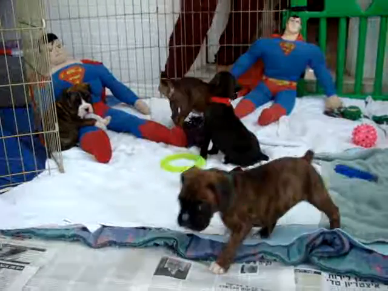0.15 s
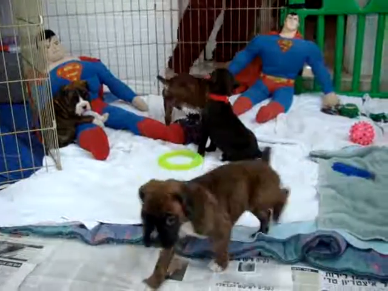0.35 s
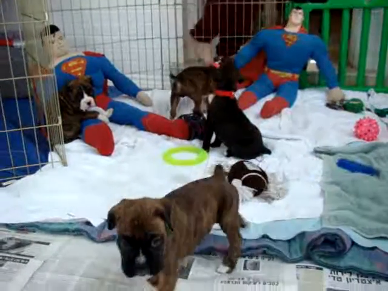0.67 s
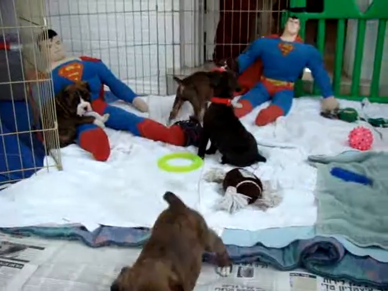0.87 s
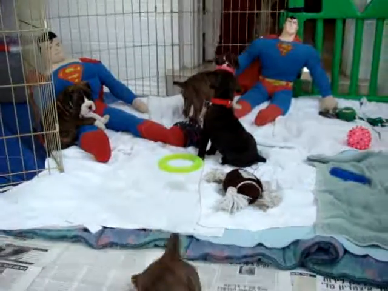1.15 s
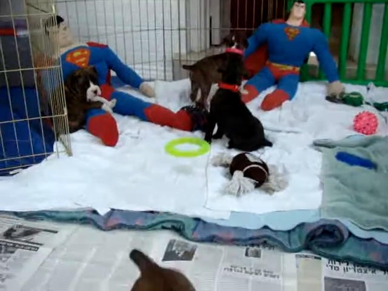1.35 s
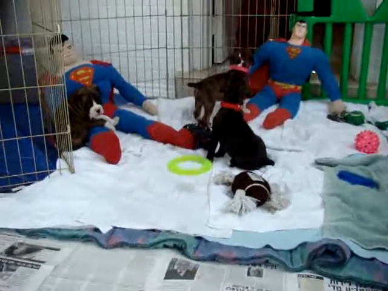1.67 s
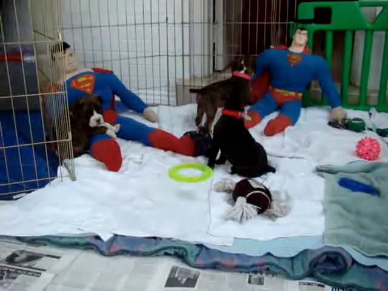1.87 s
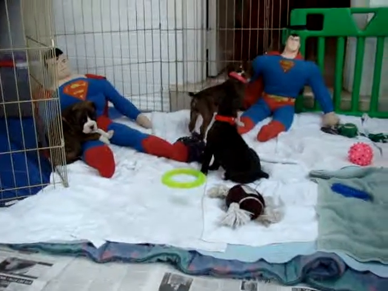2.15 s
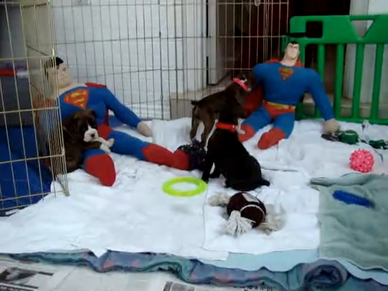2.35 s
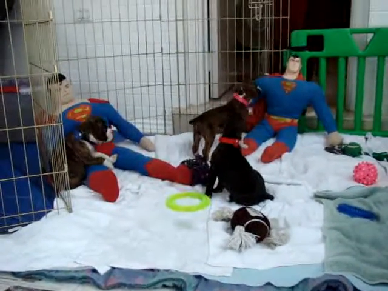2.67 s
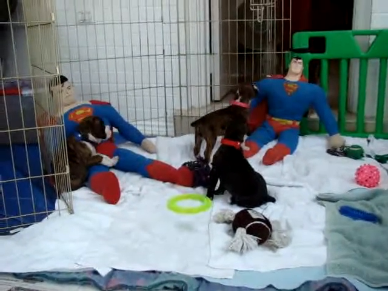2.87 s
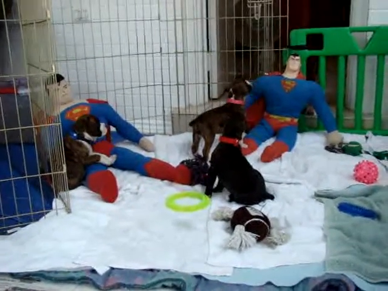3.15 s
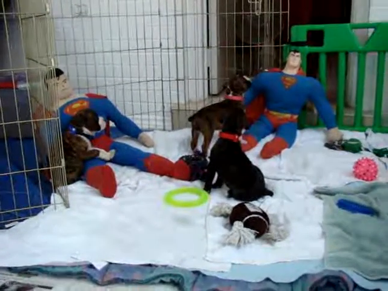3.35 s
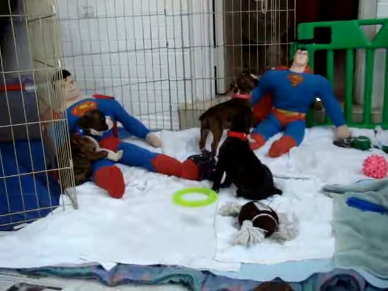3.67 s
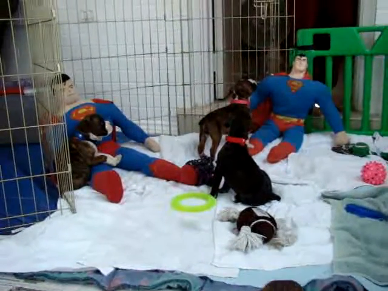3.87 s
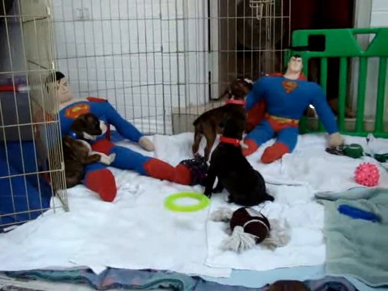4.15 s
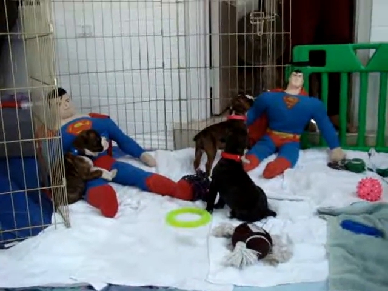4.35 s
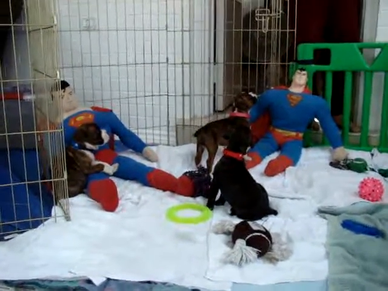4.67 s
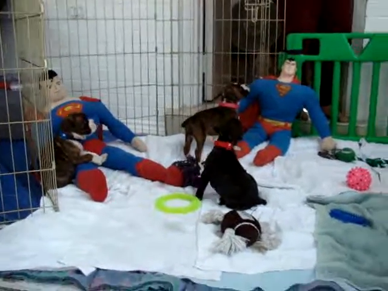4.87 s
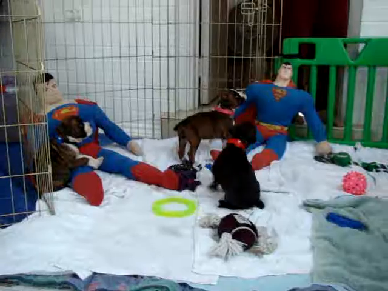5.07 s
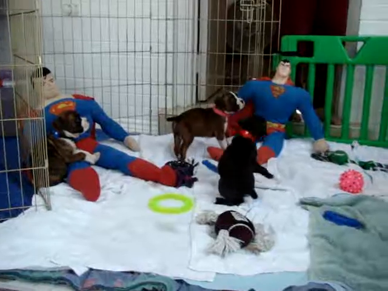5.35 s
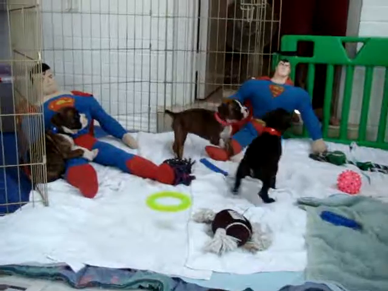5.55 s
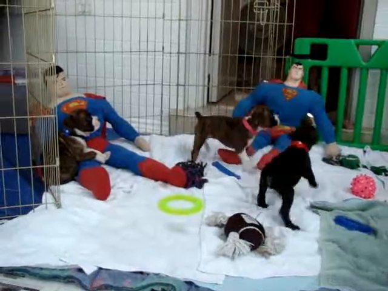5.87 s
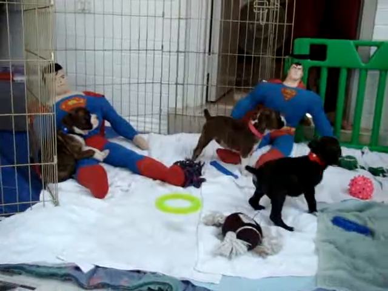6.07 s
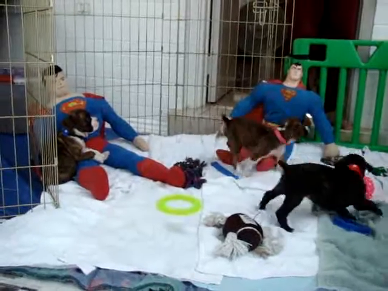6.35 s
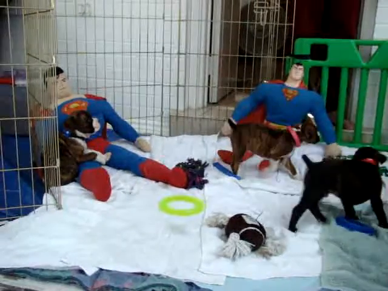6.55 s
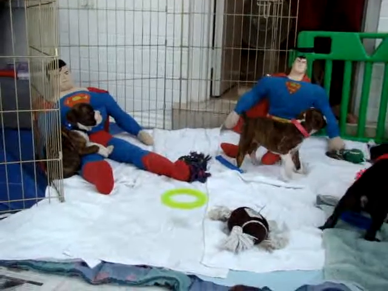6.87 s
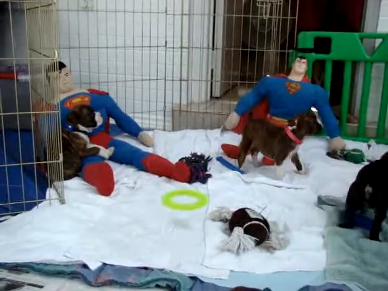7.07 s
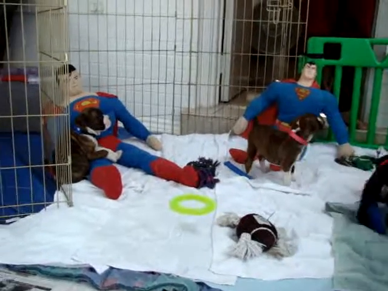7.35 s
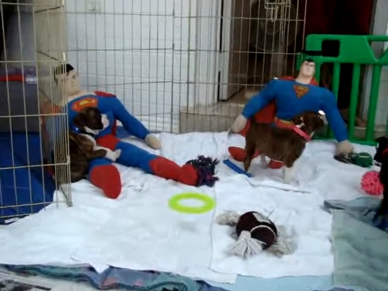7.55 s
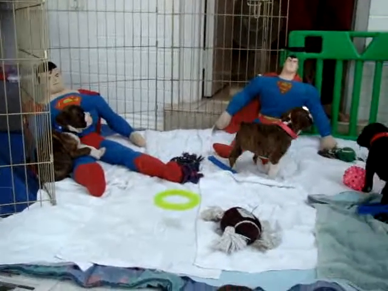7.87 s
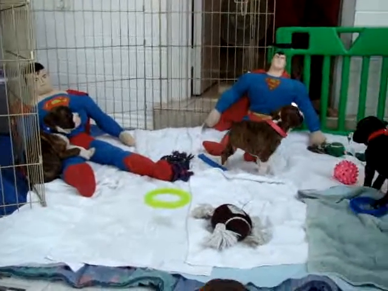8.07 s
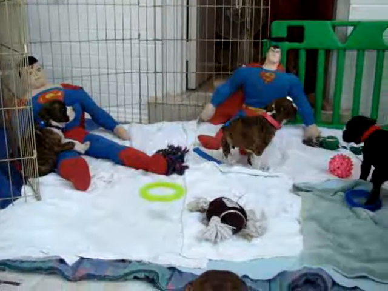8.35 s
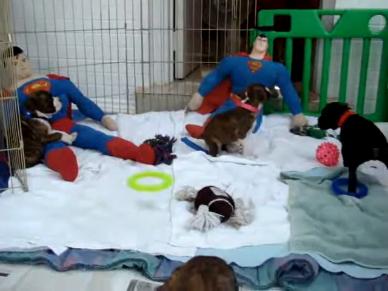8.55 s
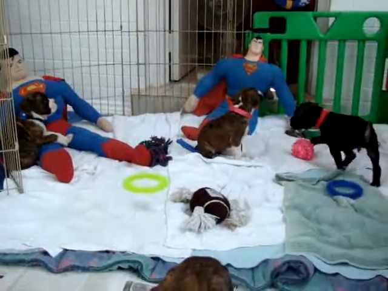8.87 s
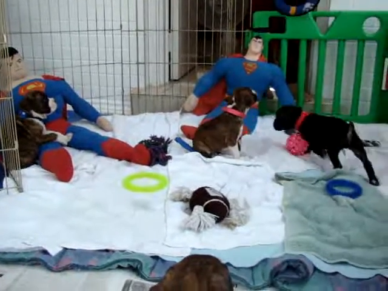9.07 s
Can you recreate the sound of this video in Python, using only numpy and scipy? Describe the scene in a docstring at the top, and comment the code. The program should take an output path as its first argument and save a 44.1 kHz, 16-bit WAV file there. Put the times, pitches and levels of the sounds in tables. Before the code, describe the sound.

Short reedy squeaks alternate with weaker falling ones as puppies shuffle on paper and bedding, with hard plastic taps close to the microphone late on.

```python
"""Puppies and a squeaky toy

Indoors in a pen, at one mono microphone: a puppy chews a squeaky toy about three times a second.
Each bite drives air out through the reed; the toy answers with a weaker, falling squeak as it refills.
Paws thump (ringing floor modes) and scuff (shaped noise) over newspaper and blankets.
Close by, something taps the camera's case, faintly early on and hard late on."""
import sys
import numpy as np
from scipy import signal
from scipy.fft import rfft, irfft, next_fast_len
from scipy.io import wavfile

SR = 44100
rng = np.random.default_rng(int(sys.argv[2]) if len(sys.argv) > 2 else 0)


def materialize(psi):
    """Save the field psi as 16-bit PCM at rate SR to the path in sys.argv[1].

    A 1-D psi becomes a single channel; in a 2-D psi each row is a channel.
    """
    bounded = np.clip(np.atleast_2d(psi).T, -1, 1)
    quanta = np.round(bounded * 32767).astype(np.int16)
    wavfile.write(sys.argv[1], SR, quanta)


N = 406161


def gain_of(db):
    """Decibels to amplitude."""
    return 10 ** (np.asarray(db) / 20)


def evened(x):
    """Scales to an rms of 1."""
    return x / np.sqrt(np.mean(x ** 2) + 1e-20)


def read_table(points, hz):
    """Reads a table along a logarithmic frequency axis."""
    f, value = np.transpose(points)
    return np.interp(np.log(hz + 1), np.log(f + 1), value)


def add(mix, s, sound):
    """Mixes a sound in at time s."""
    part = mix[max(round(s * SR), 0):][:len(sound)]
    part += sound[:len(part)]


def noise(size):
    """White noise."""
    return rng.standard_normal(size)


def coloured(x, spectrum):
    """Gives x a spectrum, at an rms of 1."""
    size = next_fast_len(len(x), True)
    gain = gain_of(read_table(spectrum, np.fft.rfftfreq(size, 1 / SR)))
    return evened(irfft(rfft(x, size) * gain, size)[:len(x)])


def wander(size, hz):
    """Chance of unit spread that changes up to hz times a second."""
    place = np.arange(size) * 2 * hz / SR
    knots = noise(int(place[-1]) + 2)
    # straight lines between knots lose spread; the last factor restores it
    return np.interp(place, np.arange(len(knots)), knots) * np.sqrt(3 / 2)


# The pen when nothing moves. Each row: frequency in Hz, relative level in dB per Hz.
ROOM_TONE = [(30, -15.5), (90, -13.5), (170, -5), (400, -3), (750, -11.5), (1200, 1.5), (2000, -14.5),
             (5000, -26.5), (10000, -30)]


def room_tone():
    """The still room is steady noise with the room's own spectrum, at an rms of -54 dB."""
    return gain_of(-54) * coloured(noise(N), ROOM_TONE)


# Paws on blankets. Each row: frequency in Hz, relative level in dB per Hz.
SCUFF = [(30, -37), (90, -30), (160, -10.5), (280, -6.5), (430, 5), (700, -0.5), (1100, -7), (2000, -19),
         (10000, -40.5)]
# Newspaper underfoot. Each row: frequency in Hz, relative level in dB per Hz.
RUSTLE = [(200, -18), (700, -3.5), (1400, 2), (2000, 4), (3500, 1.5), (6000, 0), (10000, -6.5)]
# A paw slides and drags the bedding. Each row: start in seconds, length in seconds,
# newspaper rustle in dB before the paper gain, blanket scuff in dB.
SLIDES = [(0.441, 0.22, -41, -47.5), (0.96, 0.25, -56, -66), (1.23, 0.16, -45.5, -46.5),
          (1.417, 0.1, -48, -49), (1.597, 0.099, -48, -52), (2.415, 0.2, -46.5, -54.5),
          (3.33, 0.38, -51.5, -47), (4.729, 0.13, -36.5, -44), (4.946, 0.16, -45, -46),
          (5.56, 0.13, -48, -45.5), (6.383, 0.15, -49.5, -46), (6.797, 0.13, -48, -50),
          (6.89, 0.13, -47, -45), (7.365, 0.31, -54, -54.5), (8.492, 0.23, -46, -44.5),
          (9.113, 0.14, -49, -49)]
# The litter's constant shuffling. Each row: time in seconds, level in dB before the paper's offset and gain.
SHUFFLE = [(0.0, -49), (0.62, -52.5), (0.74, -52), (1.08, -50), (2.25, -58), (2.77, -51.5), (3.67, -48.5),
           (4.08, -52.5), (4.67, -52.5), (4.9, -42), (5.26, -54), (6.75, -47.5), (7.85, -54.5), (9.21, -45)]
# A slide swells and dies in one arch: share of its length at the peak, exponent (lower is fuller)
SLIDE_PEAK_AT, SLIDE_SHAPE = 0.38, 0.54
SHUFFLE_CLOTH_DB, SHUFFLE_PAPER_DB, PAPER_GAIN_DB = 0, -5, 7.5


def movement():
    """Friction is uneven noise on cloth and lumpy noise on newspaper, always faint, swelling with each slide."""
    shuffle_db = np.interp(np.arange(N) / SR, *np.transpose(SHUFFLE))
    on_cloth, on_paper = np.zeros((2, N))
    for s, length, paper_db, cloth_db in SLIDES:
        share = np.arange(0, length, 1 / SR) / length
        progress = np.interp(share, [0, SLIDE_PEAK_AT, 1], [0, .5, 1])
        speed = abs(np.sin(np.pi * progress)) ** SLIDE_SHAPE
        add(on_cloth, s, gain_of(cloth_db) * speed)
        add(on_paper, s, gain_of(paper_db) * speed)
    lumps, crumples, grain = wander(N, 25), wander(N, 35), wander(N, 400)
    scuff = coloured(noise(N) * gain_of(3.14 * lumps), SCUFF)
    paper = coloured(noise(N) * gain_of(2.3 * crumples + 2.7 * grain), RUSTLE)
    # slides and shuffling add as powers
    scuff *= np.hypot(on_cloth, gain_of(shuffle_db + SHUFFLE_CLOTH_DB))
    paper *= np.hypot(on_paper, gain_of(shuffle_db + SHUFFLE_PAPER_DB))
    return scuff + gain_of(PAPER_GAIN_DB) * paper


def pressure(t, length, rise, fall):
    """Air pressure in the toy: a quick rise, a hold, and a fall once the stroke ends (times in seconds)."""
    build_up = 1 - np.exp(-t / rise)
    return build_up / (1 + np.exp(np.minimum((t - length) / fall, 50)))


# Air rushing past the reed. Each row: frequency in Hz, relative level in dB per Hz.
AIR = [(500, -26.5), (1300, -23), (3000, -14), (5500, 2.5), (7500, -6.5), (9600, -17), (11000, -3)]


def reed(hz, rough, partials, flutter, fray, rasp, air_db):
    """A buzzing reed; overblown, its partials flicker and split, and more air hisses by."""
    size = len(hz)
    turns = np.cumsum(hz * (1 + flutter * rough * wander(size, 200))) / SR
    # the reed also twists, far more slowly, which puts side lines beside each partial
    twist = np.sin(2 * np.pi * rng.uniform(.2, .36) * turns) * rough ** 2
    tone = np.zeros(size)
    for k in range(1, 10):
        phase = k * turns + rng.random() + .035 * k * twist
        flicker, slip, uneven = wander(size, 150), wander(size, 150), wander(size, 150)
        unrest = fray * rough * (k / 4) ** .25
        line = (1 + unrest * flicker) * np.cos(2 * np.pi * phase + unrest * slip)
        # strong and weak beats alternate: a line halfway to the next partial
        half_line = rasp * rough * uneven * np.cos(2 * np.pi * (phase + turns / 2))
        partial_db = read_table(partials, k * hz) + 2.53 * rng.standard_normal()
        tone += gain_of(partial_db) * (line + half_line)
    air = gain_of(air_db) * rough * coloured(noise(size), AIR)
    return evened((evened(tone) + air) / np.sqrt(1 + rough ** 2))


# The reed blown inwards. Each row: frequency in Hz, strength of a partial there in dB before its random offset.
REED_IN = [(1200, 1.5), (2400, 2), (3600, -3), (4800, -4.5), (6000, -9), (7200, -10.5), (8400, -11.5),
           (9600, 5.5), (10500, -1.5)]
# The toy draws air back in. Each row: start in seconds, length in seconds,
# level in dB before the mix gain and fade, settled pitch in Hz.
REFILLS = [(0.115, 0.025, -38, 1176), (0.486, 0.035, -36.5, 1215), (0.859, 0.046, -40, 1189),
           (1.24, 0.056, -39, 1193), (1.586, 0.043, -40, 1205), (1.985, 0.047, -42.5, 1182),
           (2.36, 0.065, -42.5, 1177), (3.122, 0.05, -41, 1190), (3.517, 0.051, -40, 1222),
           (3.955, 0.033, -38, 1192), (4.325, 0.062, -39, 1190), (4.681, 0.049, -37.5, 1224),
           (5.06, 0.05, -39.5, 1189), (5.423, 0.072, -43, 1165), (5.771, 0.049, -40, 1186),
           (6.099, 0.046, -43, 1173), (6.427, 0.044, -40, 1170), (6.713, 0.038, -39, 1182),
           (7.024, 0.051, -42.5, 1183), (7.302, 0.056, -40, 1177), (7.538, 0.056, -43, 1253),
           (7.726, 0.039, -40, 1232), (7.907, 0.04, -39.5, 1208), (9.034, 0.063, -35, 1275)]
# The squeak starts sharp by a share of the pitch, passes the settled pitch at a share of the stroke,
# goes on sinking to the end, and loses some dB per stroke length
REFILL_SHARP, REFILL_SETTLE_AT, REFILL_FADE_DB = 0.04, 0.699, 4.5


def refills():
    """The toy swells back, and its squeak sags as the suction fades."""
    out, t = np.zeros(N), np.arange(SR // 8) / SR
    for s, length, db, settled_hz in REFILLS:
        stroke = t / length
        hz = settled_hz * (1 + REFILL_SHARP * (1 - np.minimum(stroke, 1) / REFILL_SETTLE_AT))
        tone = reed(hz, 0.35, REED_IN, flutter=0.028, fray=1.0, rasp=0.055, air_db=-3.5)
        suction = pressure(t, length, rise=0.0014, fall=0.0032)
        add(out, s, gain_of(db - REFILL_FADE_DB * stroke) * suction * tone)
    return out


def ring(t, hz, peak_s):
    """A damped resonance whose envelope swells to 1 at peak_s and dies away."""
    return t / peak_s * np.exp(1 - t / peak_s) * np.sin(2 * np.pi * hz * t)


# Modes of the covered floor. Each row: frequency in Hz before random detuning, relative level in dB,
# t60 in seconds.
FLOOR_MODES = [(246.5, -13.5, 0.18), (308, 0, 0.053), (394, 0, 0.091), (456.6, 6, 0.036), (562, 2, 0.061),
               (740, 3.5, 0.039), (953, -5.5, 0.053)]
# Paws and toys landing on the floor. Each row: start in seconds, nominal peak in dB before the mix gain,
# main pitch in Hz, paper crackle in dB relative to the thump before its gain.
THUMPS = [(0.206, -30.5, 437, -10), (0.426, -32, 620, -12.5), (0.733, -25, 445, -16.5),
          (0.903, -15, 579, -26), (1.003, -25, 366, -16), (1.18, -29.5, 410, -8), (1.562, -26, 414, -17),
          (1.826, -24.5, 446, -12), (2.358, -40, 450, -6), (2.833, -29, 430, -18), (3.05, -32, 430, -17),
          (3.268, -29.5, 447, -17.5), (3.521, -23.5, 444, -18.5), (3.825, -31, 687, -15),
          (3.893, -36, 447, -20), (4.216, -31, 914, -17), (4.335, -35.5, 440, -22), (4.408, -36, 1094, -28),
          (4.552, -37, 1090, -7.5), (4.704, -23.5, 476, -18), (4.942, -12, 470, -20.5),
          (4.964, -18.5, 533, -24), (5.494, -36.5, 447, -13), (5.721, -22, 460, -22.5),
          (6.401, -32, 414, -9.5), (6.438, -31.5, 520, -16), (6.486, -28, 444, -13.5),
          (6.622, -34, 780, -25), (6.732, -36, 425, -8), (6.781, -23.5, 418, -17), (6.888, -20, 347, -12),
          (7.337, -28.5, 537, -22), (8.615, -26.5, 457, -13.5), (9.123, -24, 557, -22)]
CRACKLE_GAIN_DB = 10.5


def thumps():
    """A soft blow rings the floor and crushes the paper that lies on it."""
    out, t = np.zeros(N), np.arange(SR // 7) / SR
    for s, db, hz, crackle_db in THUMPS:
        floor = np.zeros(len(t))
        for mode_hz, level, t60 in FLOOR_MODES:
            swing = np.sin(2 * np.pi * (mode_hz * rng.uniform(0.882, 1.124) * t + rng.random()))
            floor += gain_of(level - 60 * t / t60) * swing
        body = 0.5 * floor * (1 - np.exp(-t / 0.00096)) + 0.68 * ring(t, hz, peak_s=0.0039)
        crush = np.exp(-t / 0.027) * (1 - np.exp(-t / 0.0012))
        paper = coloured(noise(len(t)), RUSTLE) * crush
        add(out, s, gain_of(db) * (body + gain_of(crackle_db + CRACKLE_GAIN_DB) * paper))
    return signal.sosfilt(signal.butter(1, 150, "high", fs=SR, output="sos"), out)


# The reed blown outwards. Each row: frequency in Hz, strength of a partial there in dB before its random offset.
REED_OUT = [(1200, -3.5), (2400, 0), (3600, -1.5), (4800, -0.5), (6000, 0.5), (7100, -2), (8400, 2),
            (9500, 8), (10500, -7.5)]
# One bite a row. Each row: start in seconds, length in seconds, level in dB before the mix gain and tremble,
# pitch at full pressure in Hz before flutter and catch, roughness from 0 to 1.
BITES = [(0.264, 0.05, -27, 1190, 0.45), (0.663, 0.046, -25, 1212, 0.44), (1.025, 0.059, -29, 1189, 0.4),
         (1.4, 0.047, -24.5, 1267, 0.24), (1.741, 0.06, -30, 1185, 0.19), (2.132, 0.053, -30.5, 1191, 0.17),
         (2.515, 0.05, -28.5, 1203, 0.21), (2.912, 0.061, -30, 1249, 0.24),
         (3.301, 0.041, -24.5, 1227, 0.33), (3.747, 0.028, -28.5, 1233, 0.46),
         (4.11, 0.045, -24, 1307, 0.84), (4.479, 0.039, -26.5, 1193, 0.54), (4.848, 0.047, -28, 1240, 0.44),
         (5.221, 0.045, -29, 1174, 0.28), (5.567, 0.044, -27, 1216, 0.48), (5.92, 0.044, -26, 1219, 0.32),
         (6.243, 0.0408, -24, 1277, 0.7), (6.557, 0.037, -23, 1254, 0.4), (6.844, 0.041, -25.5, 1248, 0.36),
         (7.158, 0.029, -26, 1222, 0.45), (7.414, 0.039, -23, 1380, 0.8), (7.611, 0.042, -24.5, 1447, 0.86),
         (7.792, 0.032, -25, 1220, 0.45), (8.9, 0.057, -27, 1239, 0.5), (9.116, 0.038, -25.5, 1287, 0.38)]
# A bite starts near the reed's own pitch, bends up to full pressure and sinks as the jaws stop:
# own pitch in Hz, share of the bend at the start, two shares of the stroke, final sag as a share of the pitch
REED_HZ, START_BEND, FULL_AT, EASE_AT, END_SAG = 1175.7, 0.25, 0.504, 0.84, 0.022
# Late in the stroke a rough reed catches: place and width as shares of the stroke,
# jump as a share of the pitch per unit of roughness
CATCH_AT, CATCH_WIDTH, CATCH_JUMP = 0.863, 0.2, 0.0903
# The jaws build up pressure, hold it unsteadily and let go
BITE_RISE_S, BITE_FALL_S, BITE_TREMBLE_DB = 0.0035, 0.0051, 0.5


def bites():
    """Closing jaws bend the pitch up; late in a rough stroke the reed catches, jumps in pitch and breaks up."""
    out, t = np.zeros(N), np.arange(SR // 8) / SR
    for s, length, db, full_hz, rough in BITES:
        stroke = t / length
        start_hz = REED_HZ + START_BEND * (full_hz - REED_HZ)
        bend_hz = [start_hz, full_hz, full_hz, start_hz * (1 - END_SAG)]
        hz = np.interp(stroke, [0, FULL_AT, EASE_AT, 1.3], bend_hz)
        catch_at = CATCH_AT + rng.uniform(-0.12, 0.097)
        catch = np.exp(-((stroke - catch_at) / CATCH_WIDTH) ** 4)
        hz = hz * (1 + rng.choice([-1, 1]) * CATCH_JUMP * min(rough, .5) * catch)
        growth = np.interp(stroke, [.35, .85], [.5, 1.05])
        breakup = np.minimum(rough * (growth + .8 * catch), 1)
        tone = reed(hz, breakup, REED_OUT, flutter=.022, fray=1.1, rasp=.38, air_db=-7)
        tremble_db = BITE_TREMBLE_DB * wander(len(t), 48.3)
        push = pressure(t, length, BITE_RISE_S, BITE_FALL_S)
        add(out, s, gain_of(db + tremble_db) * push * tone)
    return out


# Sharp snaps of claws and paper. Each row: start in seconds, nominal peak in dB before the mix gain.
SNAPS = [(1.004, -23.5), (1.0115, -42), (1.181, -39), (1.5625, -46), (3.2702, -40.5), (3.628, -44),
         (4.7072, -33.5), (6.3926, -33), (6.4357, -47), (6.789, -40), (6.983, -32.5), (7.566, -34)]


def snaps():
    """Claws and paper give very short bright cracks: shaped noise that dies within milliseconds."""
    out, t = np.zeros(N), np.arange(SR // 20) / SR
    spectrum = [(500, -18.5), (2000, -1.5), (3900, 2.5), (5500, -3), (10000, -6.5)]  # Hz, dB per Hz
    for s, db in SNAPS:
        crack = coloured(noise(len(t)), spectrum)
        add(out, s, gain_of(db) * crack * np.exp(-t / 0.0034))
    return out


# Modes of the camera's case. Each row: frequency in Hz before random detuning, relative level in dB,
# t60 in seconds.
CASE_MODES = [(852, -3.5, 0.028), (1144, -1.5, 0.032), (1388, 2.5, 0.019), (1680, -26, 0.019),
              (2197, 0, 0.015), (2530, -5, 0.011)]
# Contacts with the case, right at the microphone. Each row: start in seconds, nominal peak in dB before
# the mix gain, frequency rung most strongly in Hz, upper modes and tick in dB before their fixed offsets.
TAPS = [(2.571, -28, 1150, -17, -7), (2.618, -28.5, 965, -18, -14), (2.647, -30, 980, -21, -20),
        (2.731, -35, 988, -17, -25), (8.202, -4, 1380, -5, -18.5), (8.207, -7, 867, -5, -37),
        (8.238, -20, 1600, -13, -13), (8.248, -15, 1500, -5, -19), (8.409, -24.5, 1310, 5, -14),
        (8.447, -17, 1170, -1, -12), (8.502, -19, 1370, 1.5, -13.5), (8.541, -19, 970, -13, -15),
        (8.563, -28, 1320, -13, -14)]


def taps():
    """Each contact ticks, rings the heavily damped plastic case and chatters briefly."""
    out, t = np.zeros(N), np.arange(SR // 12) / SR
    chatter_spectrum = [(300, -12), (800, 1.0), (1300, 8.5), (2400, -11), (3500, -12), (8000, -62)]
    for s, db, hz, upper_db, tick_db in TAPS:
        case = np.zeros(len(t))
        for mode_hz, level, t60 in CASE_MODES:
            # where the case is touched decides which modes answer
            reach_db = upper_db + 3.5 if mode_hz > 2000 else -9 * abs(np.log2(mode_hz / hz))
            swing = np.sin(2 * np.pi * (mode_hz * rng.uniform(.95, 1.05) * t + rng.random()))
            case += gain_of(level + reach_db - 60 * t / t60) * swing
        case *= 1 - np.exp(-t / 0.0014)
        chatter = coloured(noise(len(t)), chatter_spectrum) * np.exp(-t / 0.014)
        tick = gain_of(tick_db - 1.5) * noise(len(t)) * np.exp(-t / 0.0049)
        add(out, s, gain_of(db) * (0.77 * case + tick + 0.098 * chatter))
    return out


def through_case(x):
    """The hardest taps are rounded off, and so small a case gives off no bass."""
    ceiling = .58
    rounded = ceiling * np.tanh(x / ceiling)
    return signal.sosfilt(signal.butter(3, 450, "high", fs=SR, output="sos"), rounded)


# The room's decay. Each row: frequency in Hz, t60 in seconds.
ROOM_T60 = [(200, 0.29), (1200, 0.55), (3000, 0.46), (6000, 0.32), (10000, 0.28)]


def room(x, early_share):
    """Floor and walls give a few reflections, then a diffuse tail; the paths shift as the puppies move."""
    t, out = np.arange(N) / SR, np.zeros(N)
    for k in range(3):
        # about 3000 random reflections a second, thinned out by the decay in each band
        reflections = noise(SR // 2) * (rng.random(SR // 2) < 3000 / SR)
        reflections[:SR // 150] = 0
        hz, age, z = signal.stft(reflections, SR, nperseg=256)
        decay = gain_of(-60 * age / read_table(ROOM_T60, hz)[:, None])
        echo = signal.istft(z * decay, SR, nperseg=256)[1]
        echo /= np.linalg.norm(echo)
        early = rng.integers(SR // 1000, SR // 60, size=8)
        echo[early] += early_share * rng.choice([-1, 1], size=8) / np.sqrt(8)
        # three sets of paths take turns at constant total power
        share = np.sqrt(2 / 3) * np.cos(np.pi * (t + k / 3))
        out += signal.oaconvolve(x * share, echo)[:N]
    return out


def scene():
    """Toy and paws sound in the room; the taps are right at the microphone."""
    still = room_tone()
    scuffing = movement()
    toy = gain_of(2) * bites() + gain_of(7) * refills()
    paws = gain_of(-2.5) * thumps() + gain_of(12.5) * snaps()
    case = through_case(gain_of(7.0) * taps())
    to_room = gain_of(-4.0) * toy + gain_of(-7.5) * paws + gain_of(-27) * case
    reverb = room(to_room, early_share=0.38)
    mono = toy + paws + case + reverb + scuffing + still
    return np.array([mono, mono])


def record(dry):
    """The microphone loses the deepest bass; then a steep low-pass at 10120 Hz sets the band limit."""
    thin = signal.sosfilt(signal.butter(2, 45, "high", fs=SR, output="sos"), dry)
    band_limit = signal.firwin(601, 10120, window=("kaiser", 7), fs=SR)
    return signal.oaconvolve(thin, band_limit[None], "same", axes=1)


dry = scene()
out = record(dry)
materialize(out)
```